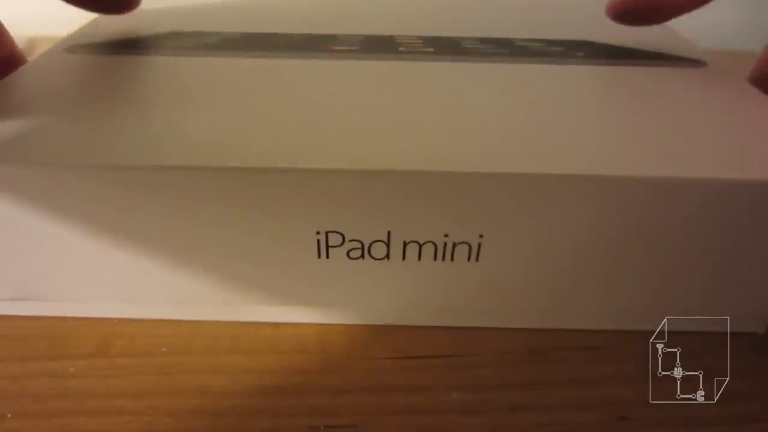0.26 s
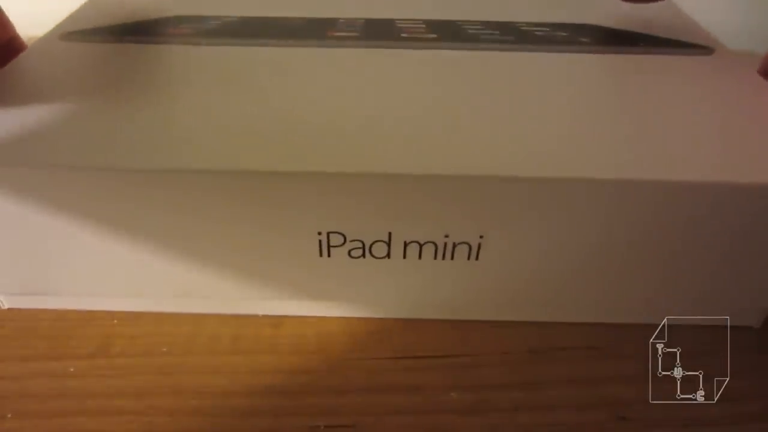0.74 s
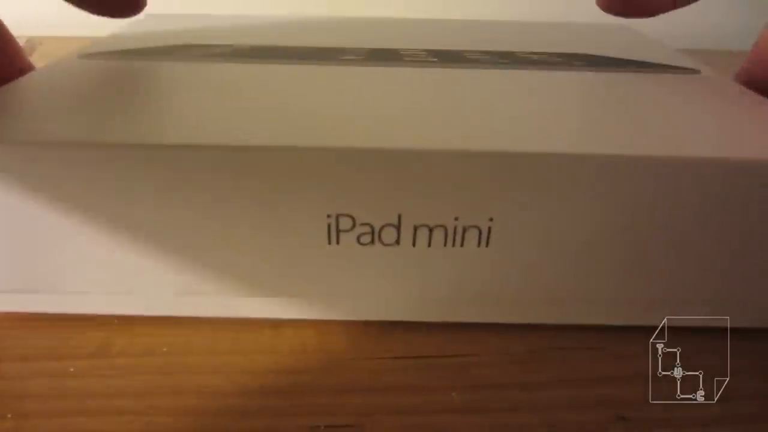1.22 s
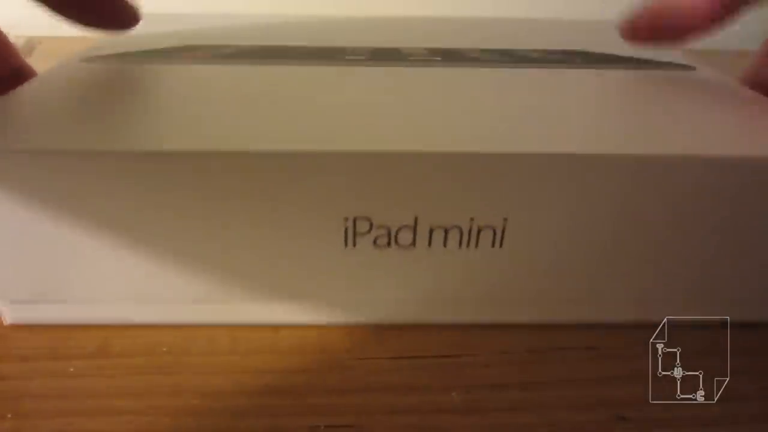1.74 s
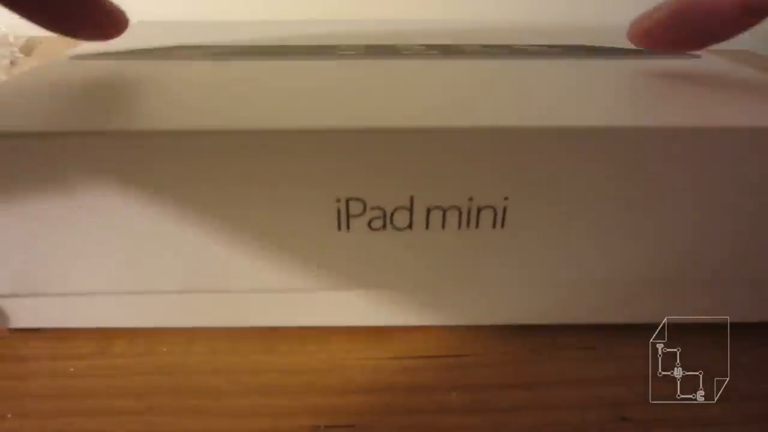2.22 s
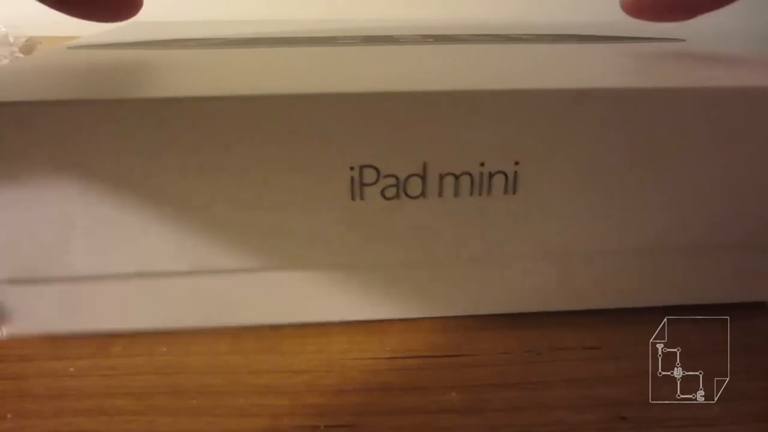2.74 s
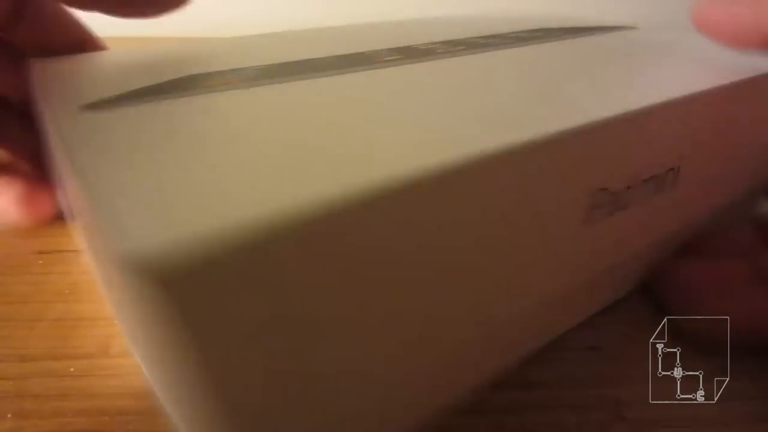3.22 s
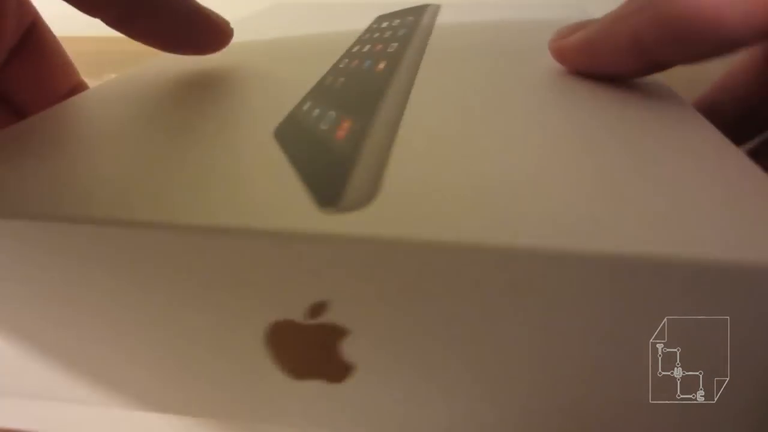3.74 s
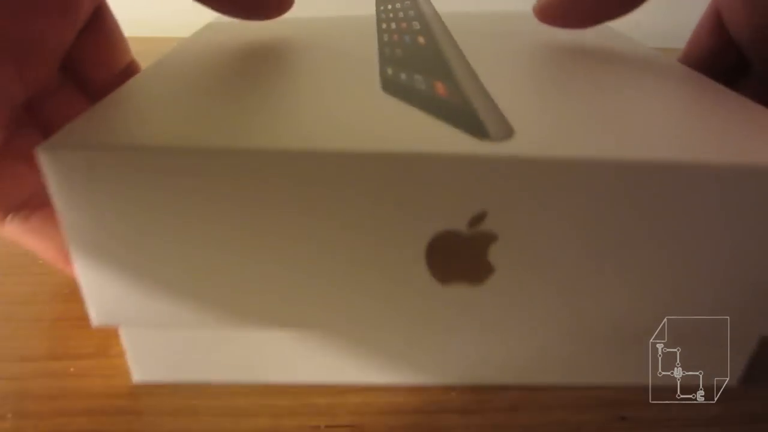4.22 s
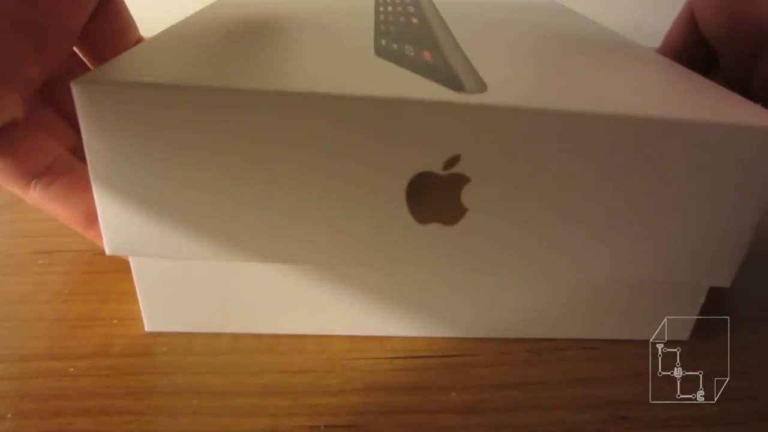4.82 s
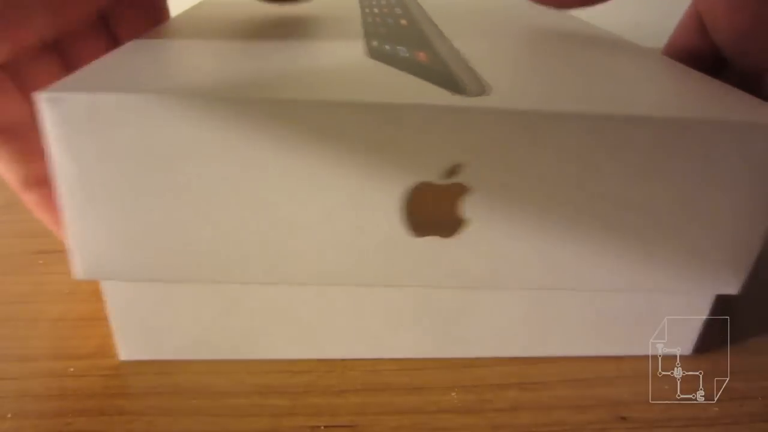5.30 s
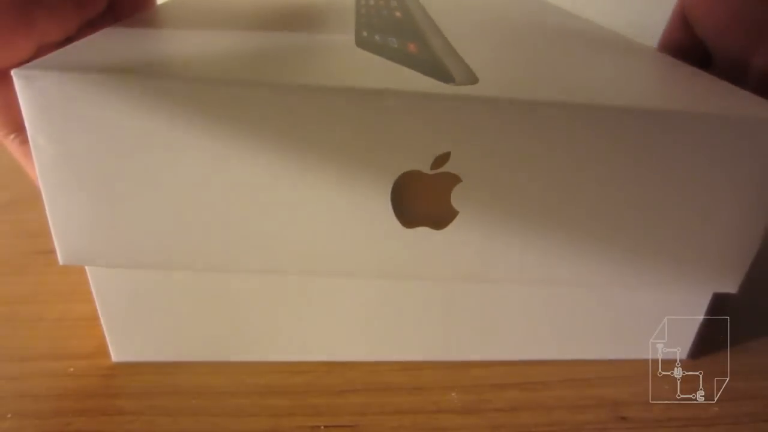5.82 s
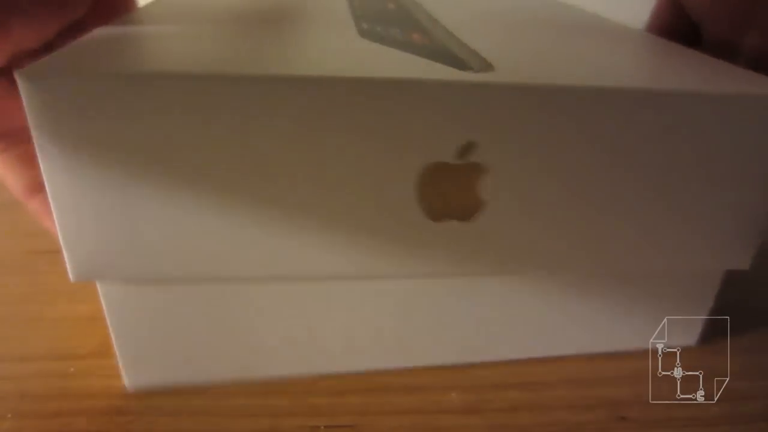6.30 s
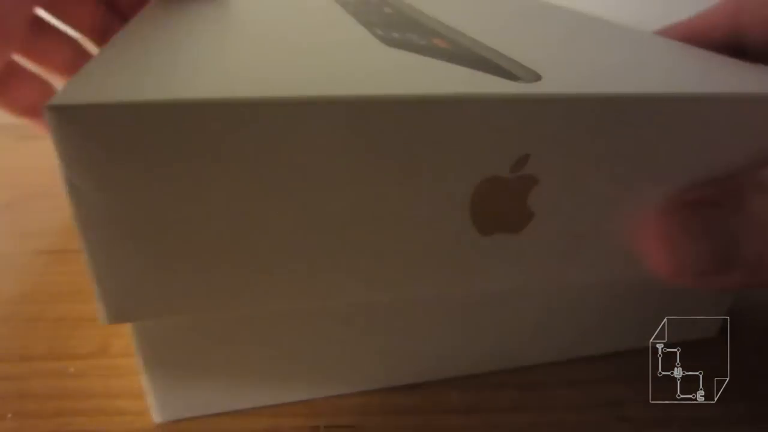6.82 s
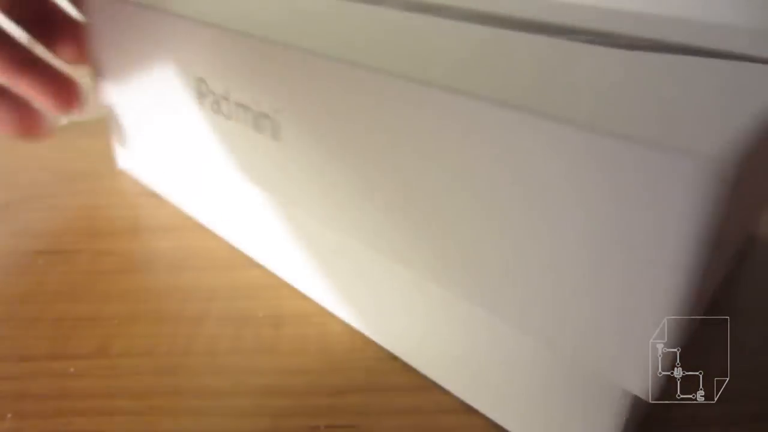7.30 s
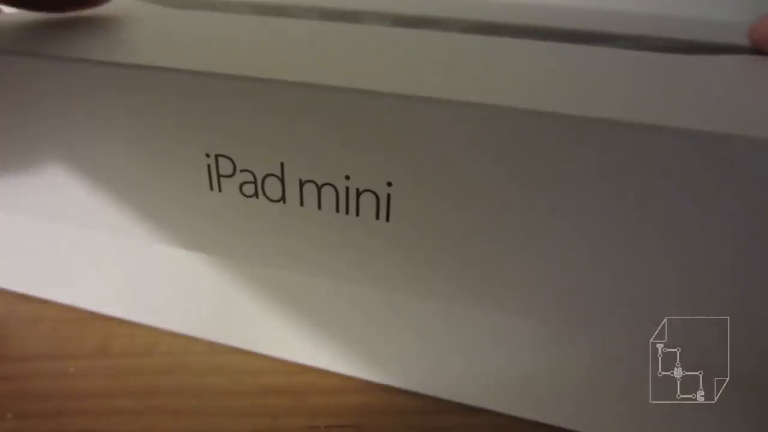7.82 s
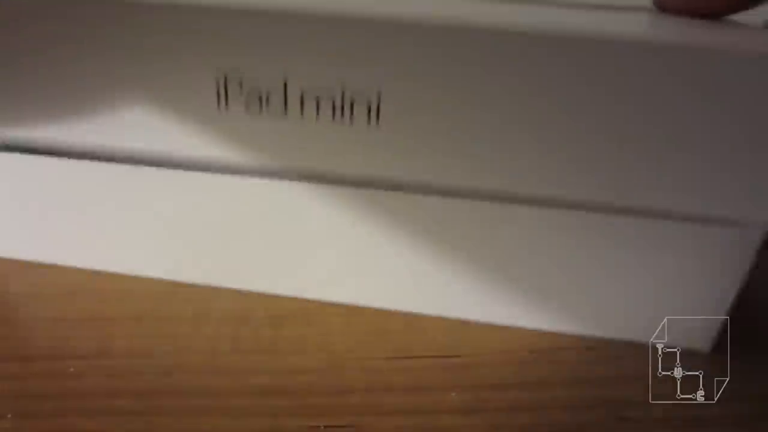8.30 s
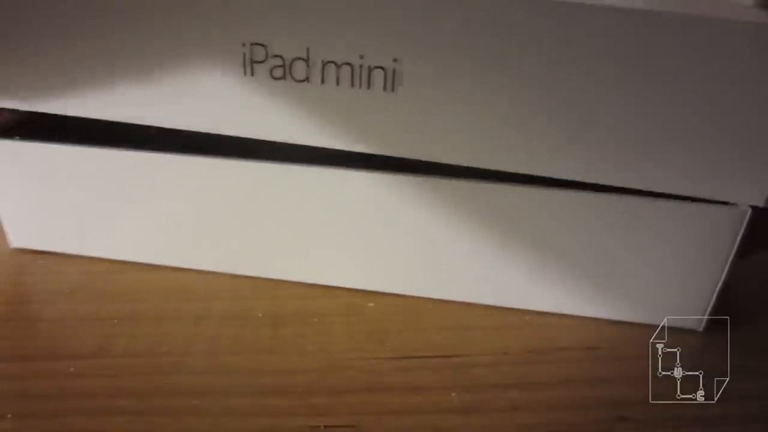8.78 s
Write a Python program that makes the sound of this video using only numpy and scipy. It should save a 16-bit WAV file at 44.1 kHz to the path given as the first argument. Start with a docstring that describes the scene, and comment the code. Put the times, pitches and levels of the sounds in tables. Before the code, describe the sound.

Close-up handling of a stiff card box on a wooden table: low creaking scrapes, dull thuds, papery swishes and scattered light ticks.

```python
"""Working the lid off a cardboard box

Two hands pull a snug lid off a box on a wooden table, close to the microphone in a small room.
Random stick-slips through box resonances make the drag; coloured slip trains make rub, swish and grit.
Damped modes make knocks, ticks and rim clicks; noise bursts snap, short tones judder.
A short room response and low steady noise lie around it."""
import sys
import numpy as np
from scipy import signal
from scipy.fft import rfft, irfft, next_fast_len
from scipy.io import wavfile
from scipy.ndimage import uniform_filter1d, map_coordinates

SR = 44100
rng = np.random.default_rng(int(sys.argv[2]) if len(sys.argv) > 2 else 0)


def master(y):
    """Save y as 16-bit WAV."""
    cut = np.clip(np.atleast_2d(y).T, -1, 1)
    pcm = np.round(cut * 32767)  # scale
    wavfile.write(sys.argv[1], SR, pcm.astype(np.int16))


N = 399161

# All event and layer levels are nominal, before the final mix.
# Box resonances: held facing front, turned round, lid nearly off.
# Each row: centre in Hz, width in Hz, gain in dB.
BOX_FRONT = [(150, 39, -7), (283, 69, -9), (445, 44.6, 2.5), (586, 80, -2), (1070, 130, -18)]
BOX_TURNED = [(146.4, 64, -6), (339, 69, 0.5), (440, 111, -3.5), (554, 50, 1.5), (1150, 160, -13.5),
              (2300, 690, -35)]
BOX_LOOSE = [(170, 170, -11.5), (330, 175, -4.5), (456, 224, -2), (604, 45, 2), (995, 58, -9)]
# Times at which the box is held anew, in seconds.
TURNS_S = [3.05, 7.4]
# Pulls of the lid along the tray.
# Each row: start in seconds, end in seconds, level at start in dB, level at end in dB.
PULLS = [(0.067, 0.315, -45.5, -55.5), (0.38, 0.475, -55, -57.5), (0.578, 0.89, -52.5, -63),
         (1.117, 1.323, -56, -53.5), (1.68, 1.794, -60, -44.5), (2.005, 2.026, -45, -41.5),
         (2.064, 2.305, -37.5, -42), (2.346, 2.48, -41.5, -42), (2.51, 2.634, -45, -42),
         (2.769, 2.797, -34.5, -44), (2.946, 2.967, -48, -50.5), (3.157, 3.383, -45, -52),
         (3.534, 3.75, -53, -45), (3.766, 4.004, -41.5, -42), (4.03, 4.09, -42.5, -47.5),
         (4.118, 4.186, -45.5, -45.5), (4.24, 4.705, -47, -47), (4.74, 4.891, -46.5, -46.5),
         (5.239, 5.292, -50.5, -47.5), (5.454, 5.62, -49.5, -46.5), (5.634, 5.744, -44.5, -43.5),
         (5.756, 5.793, -40.5, -42.5), (5.83, 5.93, -44.5, -48.5), (5.947, 6.2, -45, -45),
         (6.28, 6.827, -59, -58.5), (7.112, 7.189, -62, -48), (7.478, 7.716, -53, -51.5),
         (7.872, 8.18, -45.5, -45.5), (8.192, 8.306, -42.5, -38.5), (8.411, 8.448, -45, -54),
         (8.564, 8.585, -48, -47), (8.76, 8.8, -46, -55)]
PULL_ATTACK_DB_PER_S, PULL_RELEASE_DB_PER_S = 335.5, 180.5
# Rasp of the card: RASP_DB is relative to the drag in a pull of HARD_PULL_DB.
HARD_PULL_DB, RASP_DB, RASP_GROWTH_EXPONENT = -40, -15.5, 1
# Rasp spectrum. Each row: frequency in Hz, relative density in dB per Hz.
RASP_SPECTRUM = [(400, -21), (750, 0.5), (1100, 3), (1450, -8), (2000, -10.5), (3000, -20), (7000, -53)]
# Snags: the lid holds longer and lets go with a bump.
SNAGS_PER_S, SNAG_DB = 30, -10.5
# Changing grip moves the wall resonances by up to this share either way.
GRIP_BEND_SHARE, GRIP_SHIFTS_PER_S = 0.022, 7

# Knocks of box on table or lid on tray.
# Each row: time in seconds, wall level in dB, wall pitch in Hz, wall t60 in seconds, contact in ms,
# then thump, clack, crack and hollow ring in dB re the wall, before the fixed offsets in blow().
KNOCKS = [(0.971, -25, 452, 0.024, 1.8, -25, -13, -27, -3),
          (0.9736, -16, 290, 0.018, 1.47, -13.5, -26, -33, -10),
          (1.42, -32.5, 570, 0.037, 1.1, -6, -14, -33, -4),
          (1.553, -3.5, 521, 0.023, 1.3, -14.5, -21.5, -29.5, -13.5),
          (1.556, -9.5, 344, 0.021, 0.77, -16, -20, -34, -18),
          (1.662, -26, 274, 0.016, 0.96, -2, -10.5, -35, -7),
          (1.743, -36, 315, 0.03, 1.2, 6, -13, -16, 4.5), (2.755, -33, 564, .016, 1.4, -25, -4, -12, -23),
          (2.7665, -9.5, 500, 0.0082, 0.95, -19.5, -23, -37, -26),
          (2.773, -27.5, 171, 0.055, 1.5, -29, -19, -39, -2.5),
          (3.169, -21, 374, 0.018, 0.63, -18, -11, -19, -5),
          (3.183, -26, 347, 0.011, 0.73, -26, -11, -20.5, -13),
          (3.2712, -23, 290, 0.017, 0.67, -18, -13, -27, -3),
          (3.442, -19.5, 563, 0.018, 0.88, -46, -26, -14.5, -6.5),
          (3.467, -19.5, 477, 0.013, 0.46, -48, -29, -11.5, -18),
          (5.0815, -37.5, 514, 0.035, 1.6, -24, -13, -21, -8),
          (5.33, -34.5, 460, 0.018, 0.64, -36, -14, -30, -3),
          (6.257, -11, 663, 0.0061, 0.92, -23, -25, -32, -12.5),
          (6.2584, -15, 322, 0.055, 1.7, -13.5, -11, -23, -3.5),
          (7.07, -32.5, 217, 0.015, 1.3, -16, -17, -20, -0.5),
          (8.3075, -18.5, 440, 0.011, 0.9, -26, -24, -40, -6),
          (8.322, -20.5, 607, 0.015, 0.73, -23, -13, -35, -20),
          (8.3552, -19.5, 473, 0.014, 0.69, -21, -27, -33, -10),
          (8.404, -33.5, 218, 0.11, 0.82, -29, -11, -22, 1),
          (8.551, -28, 510, 0.0093, 2.6, -10.5, -29, -33, -1),
          (8.7263, -17.5, 574, 0.011, 1.1, -25.5, -30, -23.5, -10),
          (8.742, -25, 534, 0.015, 1.1, -24, -29, -25, -14), (8.761, -22, 595, 0.01, 3, -42, -23, -30, -27)]
# Light ticks of fingertips and card edges.
# Each row: time in seconds, wall level in dB, wall pitch in Hz,
# then clack and crack in dB re the wall, before the offsets in blow().
TICKS = [(0.9139, -38.5, 597, -11, -26), (0.94, -35, 604, -12, -35), (0.9463, -40, 560, -21, -31),
         (0.968, -28, 567, -14, -15.5), (1.072, -41.5, 616, -2, -10.5), (1.253, -44, 533, -11, -9.5),
         (1.773, -32, 626, -22, -13.5), (1.811, -39, 430, -4, -10), (2.837, -33, 554, -6, -29),
         (2.913, -35, 470, -16, -18), (3.121, -39, 483, -8, -22), (3.143, -36, 422, -8, -24),
         (3.2168, -33, 430, -0.5, -18), (3.4814, -29.5, 507, -25, -15), (4.938, -36.5, 308, -13, -18),
         (4.9868, -37.5, 423, -10, -12.5), (5.2275, -39, 446, -9, -18), (5.232, -37.5, 450, -13, -21),
         (5.2482, -42, 450, -16, -17), (5.2738, -37.5, 430, -12, -15), (6.316, -32.5, 493, -23, -21),
         (6.5955, -38, 440, -8, -7.5), (6.6033, -34, 354, -18, -4), (6.6066, -32, 410, -15, -8),
         (6.6656, -30.5, 415, -10.5, -13), (6.95, -47, 517, 0, -11), (6.975, -51.5, 563, 2, -1.5),
         (7.458, -40, 417, -4, -11.5), (7.5441, -21, 430, -11.5, -21.5), (7.6136, -25, 474, -10, -26),
         (7.799, -33, 427, -18, -7.5), (7.8132, -21.5, 483, -19, -17), (7.8884, -38.5, 564, -17, -5.5),
         (8.5009, -39, 503, -27, -14.5), (8.675, -41.5, 595, -23, -23), (8.7215, -26.5, 540, -14.5, -24),
         (8.819, -36.5, 650, -25, -31)]
# A light touch hardly stirs table or box; its wall dies by 60 dB in TICK_T60_CYCLES.
TICK_CONTACT_MS, TICK_THUMP_DB, TICK_HOLLOW_DB, TICK_T60_CYCLES = 0.42, -31.5, -17, 7.8
# Modes of the hollow box in its three holds, of the table, and of the stiff card panels.
# Each row: frequency in Hz, level in dB, t60 in seconds.
HOLLOW_FRONT_MODES = [(240, -4, .11), (323, 0, .16), (400, -7, .12), (495, 0, .2), (570, -9, .1),
                      (657, -8, .12), (818, -19, .12), (1109, -22, .13), (1276, -18, .15), (1421, -17, .14)]
HOLLOW_TURNED_MODES = [(126, -12.5, 0.28), (282, -0.5, 0.11), (344, 2, 0.094), (426, -4, .1),
                       (549, -1, .11), (650, -5, 0.15), (713, -18, 0.083), (820, -7, 0.092), (910, -11, .1),
                       (1140, -21, 0.089)]
HOLLOW_LOOSE_MODES = [(180, -4, 0.11), (333, -5, .08), (470, -5, 0.083), (581, -4, .12), (611, -2, 0.1),
                      (1028, -12.5, 0.14)]
TABLE_MODES = [(74.6, -11.5, 0.095), (103.8, -11, 0.1), (128.7, -7.5, 0.22), (160.2, 2.5, 0.093),
               (178, -4.5, 0.03)]
CLACK_MODES = [(639, -5, 0.036), (1150, -9, 0.044), (1258, -6, 0.016), (1570, -13, .016), (2000, -8, 0.014),
               (2660, -20.5, 0.0091)]
# Card-edge crack spectrum. Each row: frequency in Hz, relative density in dB per Hz.
CRACK_SPECTRUM = [(900, 13), (2200, 12.5), (3200, 7.5), (4500, 4.5), (7500, 1), (9800, -9.5),
                  (11000, -26.5)]

# Strokes of hand and card.
# Each row: fastest moment in seconds, rise in seconds, fall in seconds,
# skin rubbing on card in dB, card swishing on table and card in dB.
STROKES = [(0.15, 0.024, 0.074, -54, -71), (0.88, 0.55, 0.58, -59.5, -74.5),
           (1.158, 0.031, 0.038, -46, -67), (1.34, 0.11, 0.031, -59, -72), (1.66, 0.048, 0.54, -55, -68),
           (1.81, 0.27, 0.05, -49.5, -63.5), (1.99, 0.02, 0.052, -60, -63), (2.09, 0.068, .2, -50, -68.5),
           (2.38, 0.17, 1, -67, -73), (2.765, 0.094, 0.051, -49.5, -52.5),
           (2.83, 0.079, 0.16, -50.5, -49.5), (2.94, 0.064, 0.1, -63, -53),
           (2.976, 0.024, 0.045, -47.5, -70), (3.18, 0.066, 0.36, -46.5, -55.5),
           (3.299, 0.19, 0.11, -50, -47.5), (3.57, 0.087, 0.34, -48.5, -61),
           (3.89, 0.072, 0.48, -52.5, -62.5), (4.15, 0.13, 0.31, -61, -63.5), (4.35, 0.2, 0.2, -58, -66),
           (4.97, 0.08, 0.074, -55, -62), (5.28, 0.065, 0.045, -51, -63), (5.366, 0.044, 0.054, -51, -59),
           (5.95, 1, .4, -70.5, -95), (6.29, 0.074, 0.17, -50.5, -57), (6.36, 0.06, 0.036, -69, -61.5),
           (6.535, 0.15, 0.044, -55, -69), (6.63, 0.068, 0.25, -55.5, -59.5),
           (6.77, 0.12, 0.34, -59.5, -56.5), (7.176, 0.17, 0.17, -50.5, -46),
           (7.55, 0.078, 0.36, -52.5, -51.5), (7.64, 0.13, 0.12, -50, -54.5), (7.82, 0.054, 0.33, -54, -67),
           (8.22, 0.36, 0.11, -50.5, -61), (8.274, 0.049, 0.15, -42.5, -52),
           (8.307, 0.041, 0.013, -51, -41.5), (8.49, .08, 0.069, -55.5, -67),
           (8.59, 0.067, 0.058, -50.5, -60.5), (8.76, 0.11, 0.16, -60, -73)]
# Skin-rub and card-swish spectra. Each row: frequency in Hz, relative density in dB per Hz.
RUB_SPECTRUM = [(300, -6), (700, 9), (1200, 3), (2000, 0.5), (3200, -4.5), (4500, -10), (9000, -65.5)]
SWISH_SPECTRUM = [(600, -30), (2000, 4.5), (3800, -0.5), (5500, 4.5), (7500, 3.5), (10000, -9),
                  (10900, -32.5), (12000, -42)]
# Drop of a stroke one rise before or one fall after its peak; shape 1 = pointed, 2 = bell.
SWELL_DROP_DB, SWELL_SHAPE = 25, 1.63
# The hands never rest quite still on the card.
GRIP_RUB_DB, GRIP_SWISH_DB = -79.5, -74.5
# Stray fibres that catch and snap in a scrape; level re the swish.
CATCHES_PER_S, CATCH_DB = 110, -18
# A box corner dragged over grit and paper grain.
# Each row: fastest moment in seconds, rise in seconds, fall in seconds, level in dB.
GRITS = [(2.1, .05, .08, -57), (2.83, 0.091, 0.14, -54), (2.972, 0.019, 0.019, -55.5),
         (3.16, 0.028, 0.028, -52.5), (3.26, 0.099, 0.11, -54.5), (5.232, .006, .03, -57),
         (5.268, 0.028, .05, -57.5), (5.366, .025, .035, -60), (7.64, .09, 0.084, -55),
         (8.28, 0.035, 0.046, -48)]
# Grit spectrum. Each row: frequency in Hz, relative density in dB per Hz.
GRIT_SPECTRUM = [(500, 4), (1300, 6.5), (2600, 3.5), (4500, -7), (7500, -6.5), (10000, -28)]
# A hand brushing the lid's thin edge.
# Each row: fastest moment in seconds, rise in seconds, fall in seconds, level in dB.
BRUSHES = [(3.45, 0.0087, 0.014, -40), (3.57, 0.045, 0.17, -48.5)]
# Brushed-edge spectrum. Each row: frequency in Hz, relative density in dB per Hz.
EDGE_SPECTRUM = [(1200, -30), (1900, 5.5), (2500, 2), (3200, 7.5), (3900, -6), (6500, -8), (10000, -42.5)]
# Echoes off nearby flat surfaces. Each row: delay in ms, level in dB.
NEAR_ECHOES = [(0.852, -32.5), (2.3, -38.5), (4.4, -16.5)]

# Dry snaps of the paper facing. Each row: time in seconds, peak in dB, pitch in Hz.
SNAPS = [(2.8428, -35, 2600), (3.168, -28.5, 6560), (3.2757, -32.5, 5030), (5.2836, -37.5, 5900),
         (5.304, -45.5, 5900), (7.833, -42, 2300), (7.882, -44, 4200)]
SNAP_T60_S, SNAP_Q = 0.0097, 2
# Lid rim flicking past tray rim. Each row: time in seconds, peak in dB.
CLICKS = [(3.1824, -26), (3.215, -28.5), (3.271, -30), (3.4428, -23), (3.4448, -24), (3.4673, -18),
          (3.482, -28.5), (5.2743, -41), (7.7995, -34)]
# Stiff rim modes. Each row: frequency in Hz, level in dB, t60 in seconds.
RIM_MODES = [(1590, -6.5, 0.021), (1930, 1, 0.011), (2730, -10, 0.0088), (3140, -5.5, 0.021),
             (3400, 2, 0.014), (4080, -5, 0.0086), (5260, -2.5, 0.01), (8020, -6.5, 0.0053)]
# Judders of the lid. Each row: start in seconds, length in seconds, slips per second, level in dB.
JUDDERS = [(5.331, 0.0096, 500, -35.5), (6.375, 0.018, 400, -34.5), (8.277, 0.023, 510, -30.5)]
JUDDER_EDGE_S, JUDDER_OVERTONE_DB = 0.0016, -14

# Room decay. Each row: frequency in Hz, t60 in seconds.
ROOM_T60 = [(120, 0.3), (500, 0.13), (2000, 0.16), (10000, 0.12)]
# Room noise, common to both channels and opposed between them.
# Each row: frequency in Hz, relative density in dB per Hz.
HUSH_MID_SPECTRUM = [(15, -43), (25, 5), (65, 7), (97, 11.5), (560, 6.5), (1380, 2), (1770, 2.5),
                     (2860, -7), (3240, -10.5), (5910, -15), (10000, -76), (13000, -106), (22000, -120)]
HUSH_SIDE_SPECTRUM = [(15, -40), (25, 0.5), (99, -5.5), (177, -0.5), (292, -4), (436, -5), (506, -6.5),
                      (1160, -12), (1770, -13.5), (1960, -17), (4060, -30), (7780, -33), (10000, -56.5),
                      (13000, -73.5), (22000, -120)]
TOP_HZ = 12400


def drag(resonances, hold):
    """Lid creep in one hold: slips and snags excite the box resonances; hard pulls add rasp."""
    def box(hz):
        response = 0
        for k, (centre_hz, width_hz, db) in enumerate(resonances):
            damping = 1j * hz * width_hz
            # alternate signs
            response = response + (-1) ** k * amp(db) * damping / (centre_hz ** 2 - hz ** 2 + damping)
        return response

    slip_spectrum = [(40, -12.5), (120, 7.5), (1200, -1.5), (3000, -8.0), (8000, -34)]
    soft = coloured(slips(rate_per_s=3800, scatter_db=1.5), slip_spectrum)
    # grip crossfades slackened and stiffened walls
    grip = np.clip(0.5 + 0.5 * wobble(rate_per_s=GRIP_SHIFTS_PER_S), 0, 1)
    slack = filtered(soft, lambda hz: box(hz / (1 - GRIP_BEND_SHARE)))
    taut = filtered(soft, lambda hz: box(hz / (1 + GRIP_BEND_SHARE)))
    creep = unit((1 - grip) * slack + grip * taut)
    # level out the slow random swelling of the creep
    power = np.abs(uniform_filter1d(creep ** 2, size=SR // 14))
    levelled_creep = creep / np.sqrt(power)

    bump_spectrum = [(40, -14), (130, 5), (450, 0), (900, -14), (2500, -45)]
    bumps = coloured(slips(rate_per_s=SNAGS_PER_S, scatter_db=0), bump_spectrum)
    snags = amp(SNAG_DB) * unit(filtered(bumps, box))

    surge_db = 0.85 * wobble(rate_per_s=24)
    pulls = [row for row in PULLS if np.searchsorted(TURNS_S, row[0]) == hold]
    effort = np.max([pull(*row) for row in pulls], axis=0)
    hardness = (effort / amp(HARD_PULL_DB)) ** RASP_GROWTH_EXPONENT
    scrape = coloured(slips(rate_per_s=1500, scatter_db=1.5), RASP_SPECTRUM)
    rasp = amp(RASP_DB) * hardness * spread(scrape, side_db=-10.5)
    return effort * amp(surge_db - 0.7) * (spread(levelled_creep + snags, side_db=-21.5) + rasp)


def pull(start_s, end_s, start_db, end_db):
    """Gain of one pull: the lid breaks loose, slides with changing effort, settles more slowly."""
    t = np.arange(N) / SR
    attack_db = PULL_ATTACK_DB_PER_S * np.maximum(start_s - t, 0)
    release_db = PULL_RELEASE_DB_PER_S * np.maximum(t - end_s, 0)
    return amp(np.interp(t, [start_s, end_s], [start_db, end_db]) - attack_db - release_db)


def taps():
    """Knocks and light ticks strike the same box, in its current hold."""
    ticks = [(s, db, wall_hz, TICK_T60_CYCLES / wall_hz, TICK_CONTACT_MS,
              TICK_THUMP_DB, clack_db, crack_db, TICK_HOLLOW_DB)
             for s, db, wall_hz, clack_db, crack_db in TICKS]
    holds = (HOLLOW_FRONT_MODES, HOLLOW_TURNED_MODES, HOLLOW_LOOSE_MODES)
    out = np.zeros((2, N + SR))
    for s, db, *touch in KNOCKS + ticks:
        hollow = holds[np.searchsorted(TURNS_S, s)]
        add(out, s, amp(db) * blow(hollow, *touch))
    # keep the taps free of deep bass
    highpass = signal.butter(N=3, Wn=72, btype="highpass", fs=SR, output="sos")
    return signal.sosfilt(highpass, out[:, :N])


def blow(hollow, wall_hz, wall_t60_s, contact_ms, thump_db, clack_db, crack_db, hollow_db):
    """A blow flexes one wall, thumps the table, rings the hollow box and cracks at the card edge."""
    t = np.arange(SR // 3) / SR
    press = 1 - np.exp(-(1000 * t / contact_ms) ** 2)
    flex = press * amp(-60 * t / wall_t60_s)
    wall = flex / flex.max() * np.sin(2 * np.pi * wall_hz * t)
    # a harder corner also drives the wall's next bending mode
    overtone_gain = amp(clack_db + 5.0 - 60 * t / 0.014)
    wall += press * overtone_gain * np.sin(2 * np.pi * 2.524 * wall_hz * t)
    hollow_ring = amp(hollow_db - 8.5) * ring(hollow, t, detune=0.0099)
    thump = amp(thump_db) * ring(TABLE_MODES, t, detune=0)
    body = wall + press * (hollow_ring + thump)
    clack = amp(clack_db + 5.5) * np.array([ring(CLACK_MODES, t, detune=0.07) for _ in range(2)])
    noise = coloured(rng.standard_normal((2, len(t))), CRACK_SPECTRUM)
    crack = amp(crack_db + 6.5 - 60 * t / 0.023) * noise
    onset = 1 - np.exp(-t / 0.0006)
    return body + onset * spread(clack + crack, side_db=-8.0)


def strokes():
    """Skin rubs card with a dull hiss; card on its fibres hisses finer and brighter, with catches."""
    rub_power, swish_power = amp(GRIP_RUB_DB) ** 2, amp(GRIP_SWISH_DB) ** 2
    for peak_s, rise_s, fall_s, rub_db, swish_db in STROKES:
        power = swell(peak_s, rise_s, fall_s, 0) ** 2
        rub_power = rub_power + power * amp(rub_db) ** 2
        swish_power = swish_power + power * amp(swish_db) ** 2
    rub_hiss = coloured(slips(rate_per_s=4000, scatter_db=-0.5), RUB_SPECTRUM)
    swish_hiss = coloured(slips(rate_per_s=23000, scatter_db=-1.5), SWISH_SPECTRUM)
    fibre_snaps = coloured(slips(rate_per_s=CATCHES_PER_S, scatter_db=4.0), CRACK_SPECTRUM)
    rub = np.sqrt(rub_power) * spread(rub_hiss, side_db=-11.5)
    swish = np.sqrt(swish_power) * spread(swish_hiss, side_db=-5.5)
    catches = amp(CATCH_DB) * np.sqrt(swish_power) * spread(fibre_snaps, side_db=-12.5)
    # the pressure is never quite even
    return (rub + swish + catches) * amp(0.82 * wobble(rate_per_s=160))


def swell(peak_s, rise_s, fall_s, db):
    """Gain of one stroke: the hand speeds up to its fastest moment and slows again."""
    t = np.arange(N) / SR - peak_s
    distance = np.abs(t / np.where(t < 0, rise_s, fall_s))
    return amp(db - SWELL_DROP_DB * distance ** SWELL_SHAPE)


def grit():
    """Coarse grains crackle in clumps under a dragged corner."""
    grains = slips(rate_per_s=1100, scatter_db=2) * amp(3.2 * wobble(rate_per_s=130))
    gain = sum(swell(*row) for row in GRITS)
    return gain * spread(coloured(grains, GRIT_SPECTRUM), side_db=-9.5)


def brush():
    """Stroking the lid's thin edge gives a papery band of fibre slips."""
    fibres = slips(rate_per_s=6000, scatter_db=2)
    gain = sum(swell(*row) for row in BRUSHES)
    return gain * spread(coloured(fibres, EDGE_SPECTRUM), side_db=-6.0)


def near_echoes(x):
    """Delayed copies off nearby flat surfaces comb the hiss of rubbing."""
    def comb(hz):
        return 1 + sum(amp(db) * np.exp(-2j * np.pi * hz * ms / 1000) for ms, db in NEAR_ECHOES)

    return filtered(x, comb)


def snaps():
    """The paper facing lets go with a tiny burst in one bright resonance, too small to move the wall."""
    out, t = np.zeros((2, N)), np.arange(SR // 30) / SR
    for s, db, hz in SNAPS:
        noise = coloured(rng.standard_normal((2, len(t))), CRACK_SPECTRUM)
        burst = amp(-60 * t / SNAP_T60_S) * noise
        snap = signal.lfilter(*signal.iirpeak(hz, SNAP_Q, fs=SR), burst)
        add(out, s, amp(db) * spread(snap / np.abs(snap[0]).max(), side_db=-6.5))
    return out


def clicks():
    """The lid's rim flicks past the tray's and rings briefly in its own stiff modes."""
    out, t = np.zeros((2, N)), np.arange(SR // 20) / SR
    for s, db in CLICKS:
        rim = np.array([ring(RIM_MODES, t, detune=0.022) for _ in range(2)])
        add(out, s, amp(db) * spread(rim / np.abs(rim[0]).max(), side_db=-8.5))
    return out


def judders():
    """The lid sticks and slips at an almost even rate: a short grunt of two harmonics."""
    out, t = np.zeros(N), np.arange(SR // 12) / SR
    for s, length_s, rate_hz, db in JUDDERS:
        slip_hz = rate_hz * (1 + 0.17 * wobble(rate_per_s=400)[:len(t)])
        phase = 2 * np.pi * np.cumsum(slip_hz) / SR
        attack = 1 - np.exp(-t / JUDDER_EDGE_S)
        release = np.exp(-np.maximum(t - length_s, 0) / JUDDER_EDGE_S)
        tone = np.sin(phase) + amp(JUDDER_OVERTONE_DB) * np.sin(2 * phase)
        add(out, s, amp(db) * attack * release * tone)
    return out


def room(x):
    """Decaying noise tail: builds up over the first echoes, then fades at a rate set by frequency."""
    hz, t, z = signal.stft(rng.standard_normal((2, SR // 2)), SR, nperseg=256)
    build = np.interp(t, [0, 0.014, 0.028], [0.3, 0.4, 1])
    decay = amp(-60 * t / along(ROOM_T60, hz)[:, None])
    tail = signal.istft(z * build * decay, SR, nperseg=256)[1]
    tail = spread(tail / np.linalg.norm(tail[0]), side_db=-13.0)
    delayed = np.pad(x.mean(0), (SR // 200, 0))  # 5 ms
    return signal.fftconvolve(delayed[None], tail, axes=1)[:, :N]


def hush():
    """Steady coloured room noise, largely opposed between the channels."""
    mid = amp(-59.0) * coloured(rng.standard_normal(N), HUSH_MID_SPECTRUM)
    side = amp(-53) * coloured(rng.standard_normal(N), HUSH_SIDE_SPECTRUM)
    return np.array([mid + side, mid - side])


def slips(rate_per_s, scatter_db):
    """Two trains of tiny releases at shared random times, with separate, very unequal sizes."""
    chance = rng.random(N) < rate_per_s / SR
    size = amp(scatter_db * rng.standard_normal(N))
    return unit(chance * size * rng.standard_normal((2, N)))


def ring(modes, t, detune):
    """Sum of damped sine modes, each with random strength and pitch shift (-1.4 to 1 times detune)."""
    strength_db = rng.normal(0, 2, len(modes))
    bend = 1 + detune * rng.uniform(-1.4, 1, len(modes))
    out = 0
    for k, (hz, db, t60_s) in enumerate(modes):
        gain = amp(db + strength_db[k] - 60 * t / t60_s)
        out = out + gain * np.sin(2 * np.pi * hz * bend[k] * t)
    return out


def wobble(rate_per_s):
    """Smooth random curve through normal knots, rate_per_s knots a second."""
    knots = rng.standard_normal(int(N * rate_per_s / SR) + 4)
    return map_coordinates(knots, [np.arange(N) * rate_per_s / SR])


def add(out, s, sound):
    """Mix a short sound into out from time s in seconds."""
    out[..., round(s * SR):][..., :sound.shape[-1]] += sound


def spread(pair, side_db):
    """Left and right from a common and an opposed signal."""
    side = amp(side_db) * pair[1]
    return np.array([pair[0] + side, pair[0] - side])


def coloured(x, spectrum):
    """x shaped by a (Hz, dB) spectrum, at rms 1."""
    return unit(filtered(x, lambda hz: amp(along(spectrum, hz))))


def filtered(x, response):
    """x times a complex response of frequency."""
    n = x.shape[-1]
    m = next_fast_len(n + 8192)
    return irfft(rfft(x, m) * response(np.fft.rfftfreq(m, 1 / SR)), m)[..., :n]


def along(points, hz):
    """(Hz, value) points interpolated on a log frequency axis."""
    f, v = np.transpose(points)
    return np.interp(np.log(hz + 1), np.log(f + 1), v)


def unit(x):
    """x at rms 1."""
    return x / np.sqrt(np.mean(x ** 2) + 1e-20)


def amp(db):
    """Amplitude ratio of a level in dB."""
    return 10 ** (np.asarray(db) / 20)


def scene():
    """Lid, hands and knocks sound in the room, slightly to the right, over its steady noise."""
    lid = drag(BOX_FRONT, hold=0) + drag(BOX_TURNED, hold=1) + drag(BOX_LOOSE, hold=2)
    rubbing = amp(-0.2) * near_echoes(strokes() + brush() + grit())
    box = lid + rubbing + taps() + snaps() + clicks() + judders()
    pan = amp([[-0.35], [0.35]])
    return (box + amp(-16.0) * room(box)) * pan + hush()


def record(dry):
    """Sharp band limit: nothing from TOP_HZ up is kept."""
    return filtered(dry, lambda hz: hz < TOP_HZ)


dry = scene()
out = record(dry)
master(out)
```